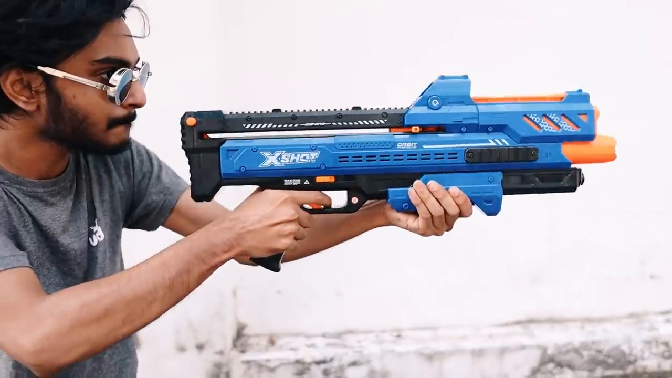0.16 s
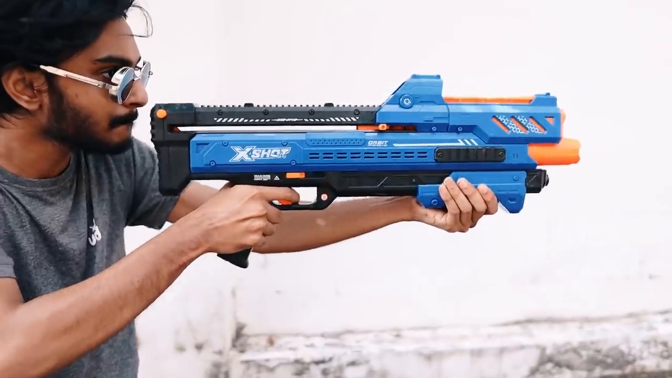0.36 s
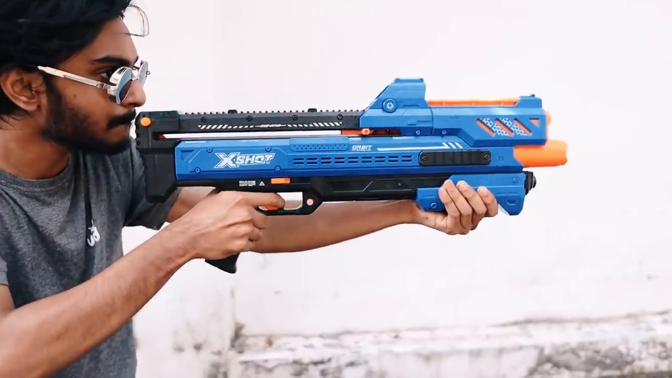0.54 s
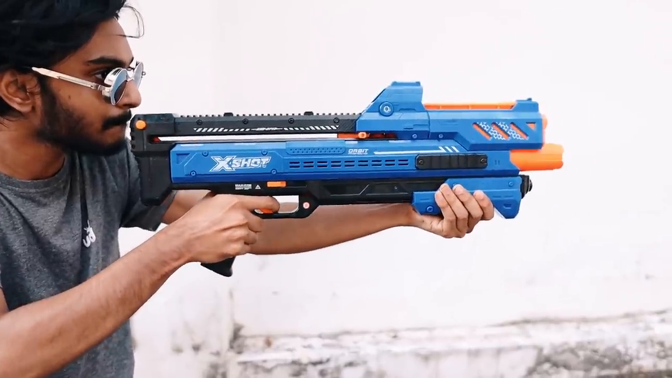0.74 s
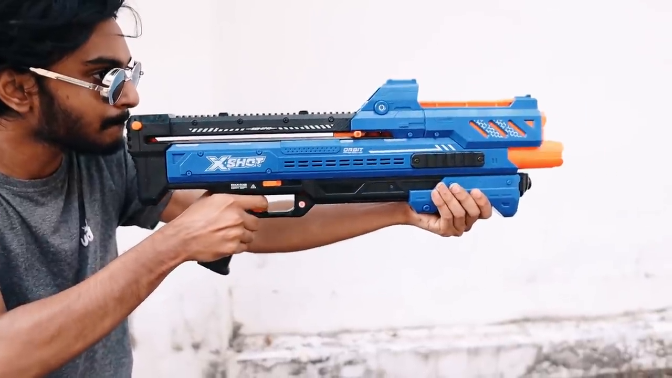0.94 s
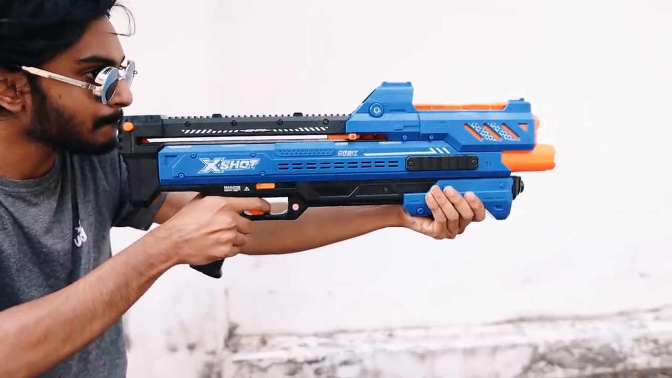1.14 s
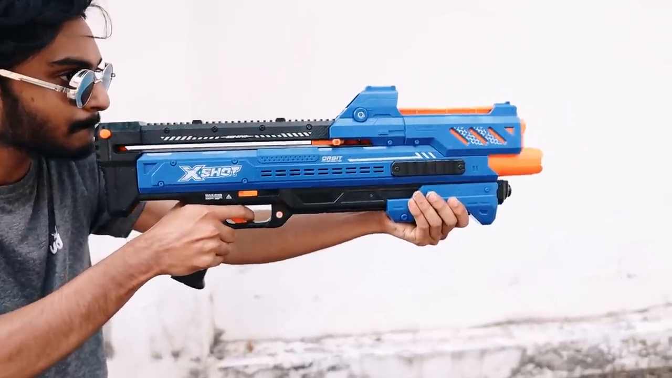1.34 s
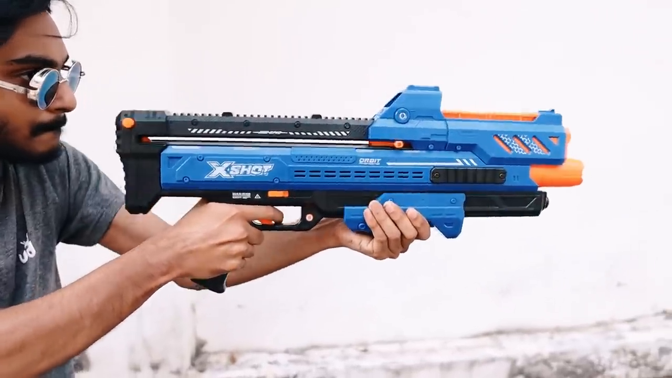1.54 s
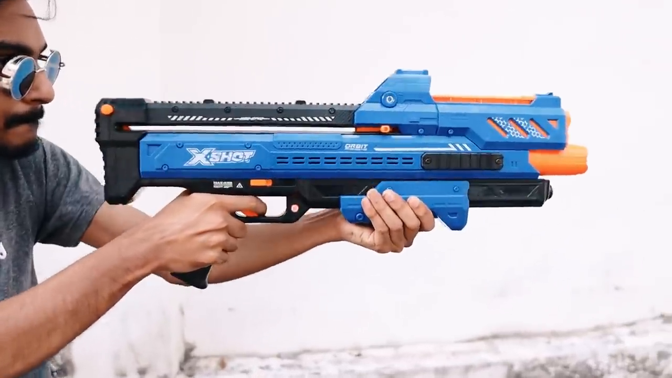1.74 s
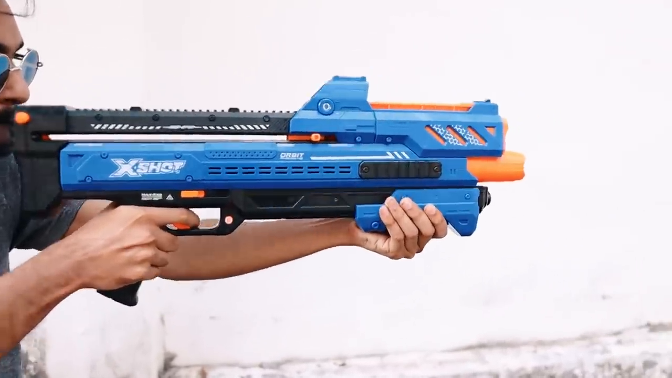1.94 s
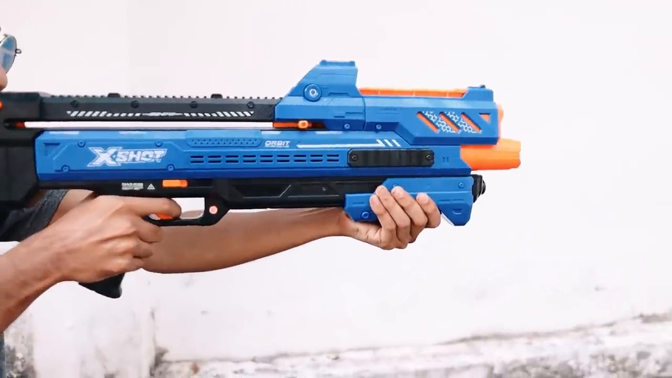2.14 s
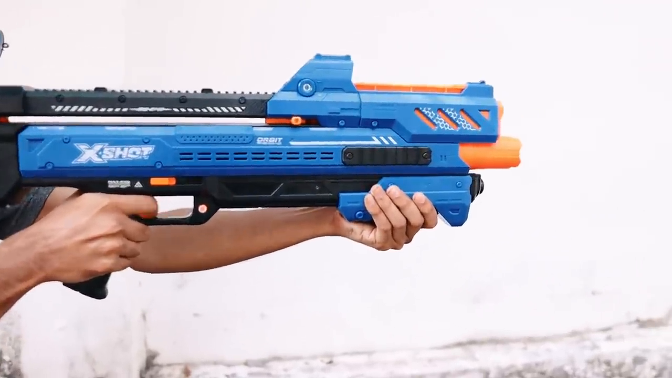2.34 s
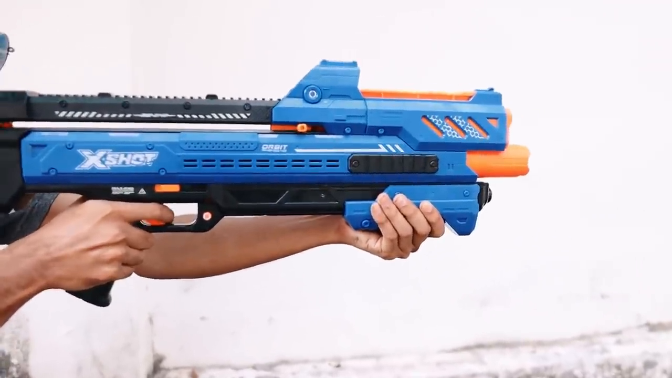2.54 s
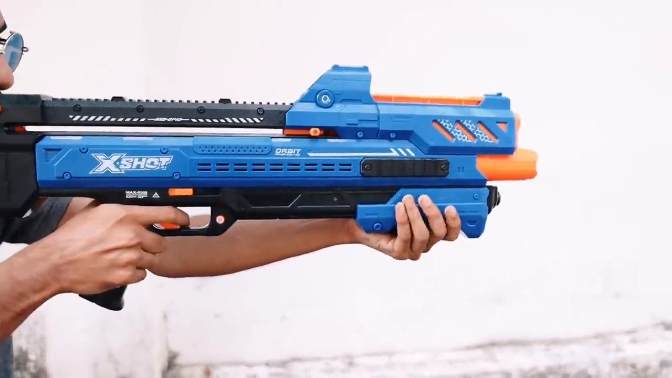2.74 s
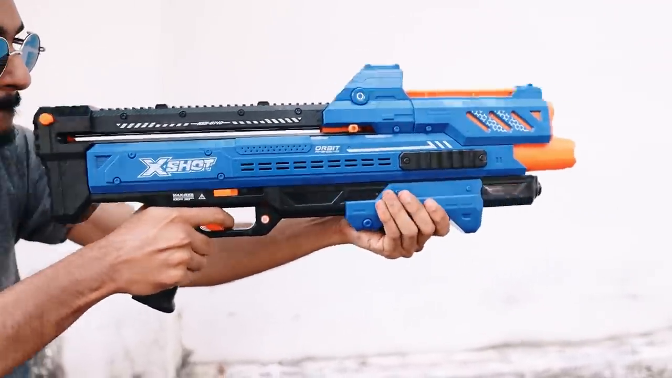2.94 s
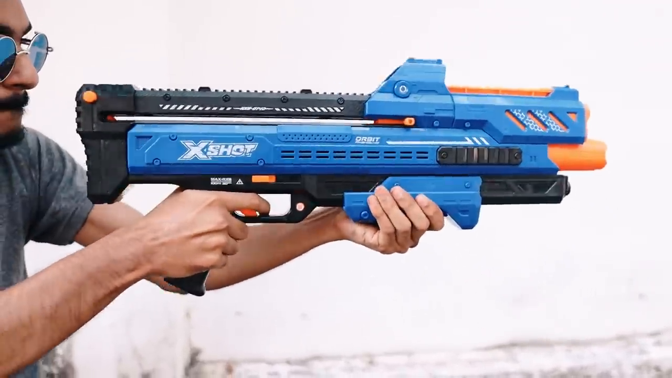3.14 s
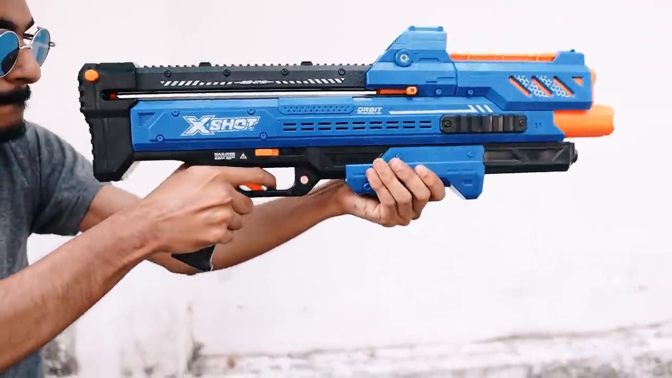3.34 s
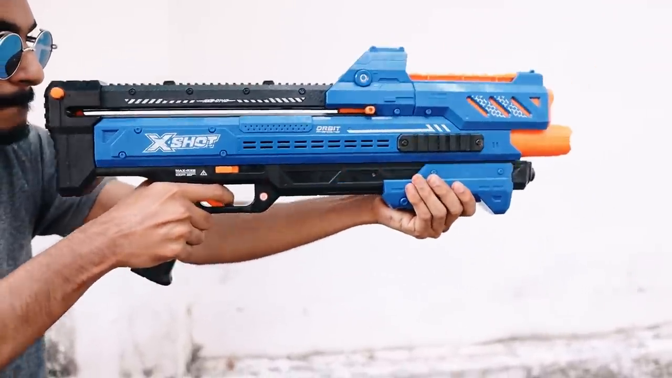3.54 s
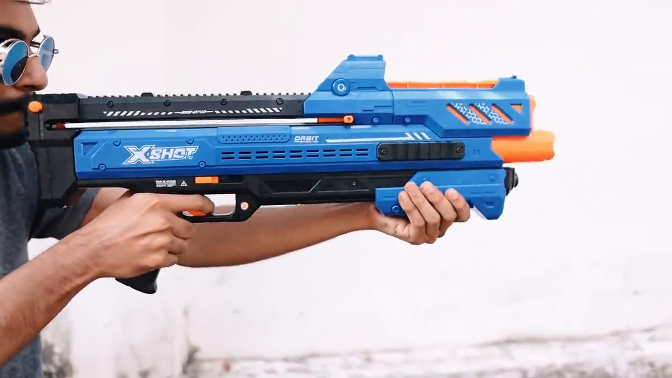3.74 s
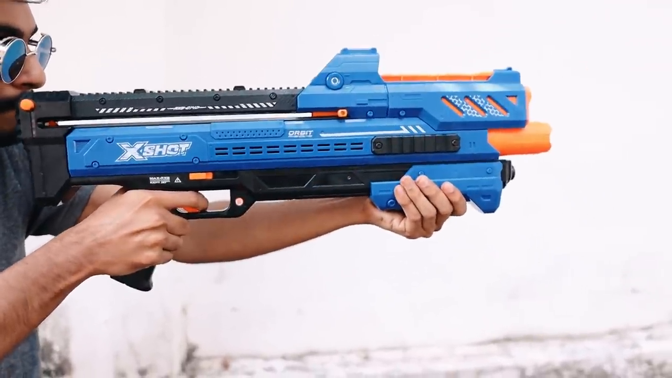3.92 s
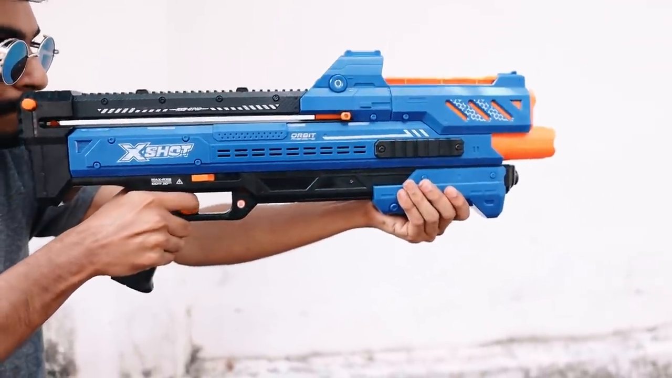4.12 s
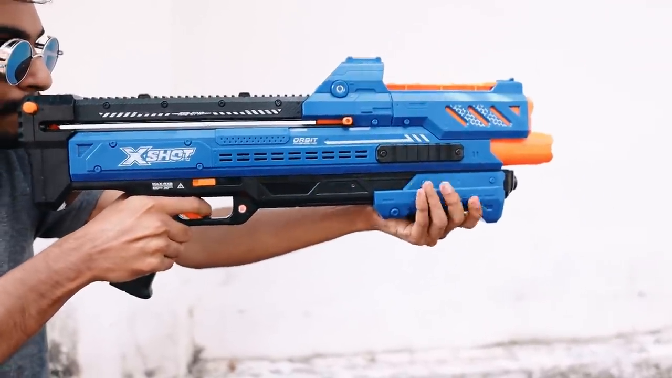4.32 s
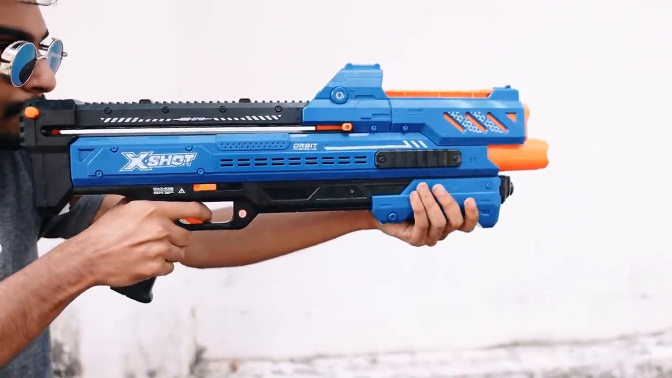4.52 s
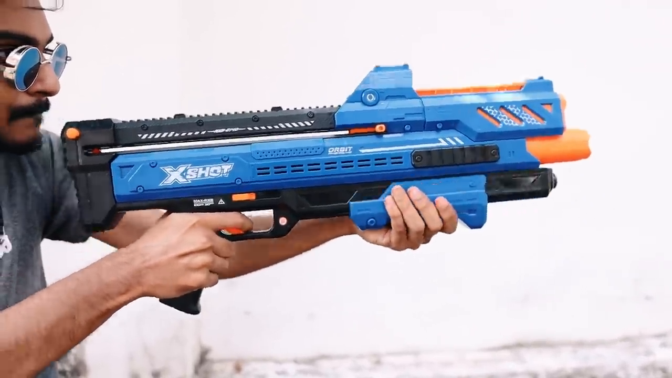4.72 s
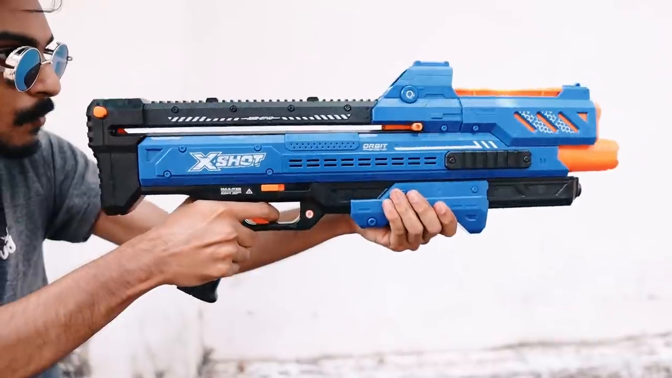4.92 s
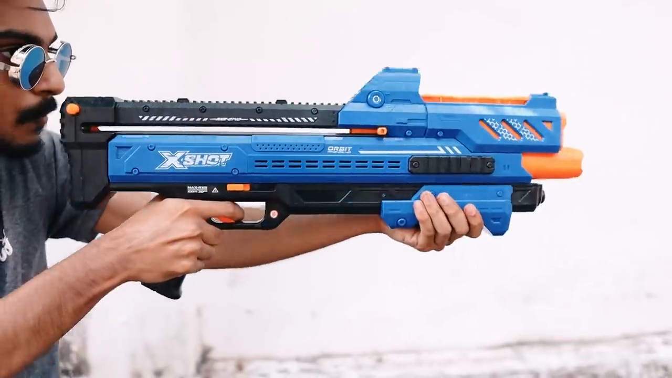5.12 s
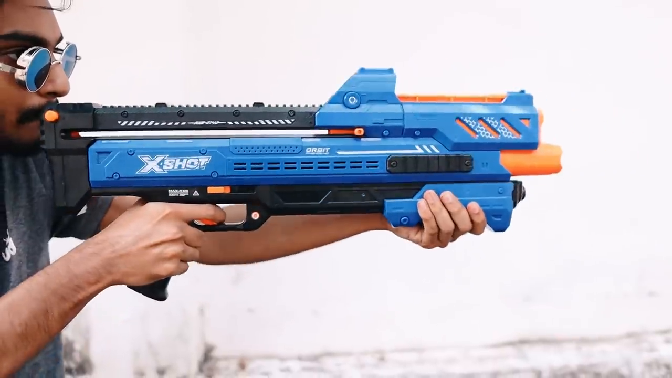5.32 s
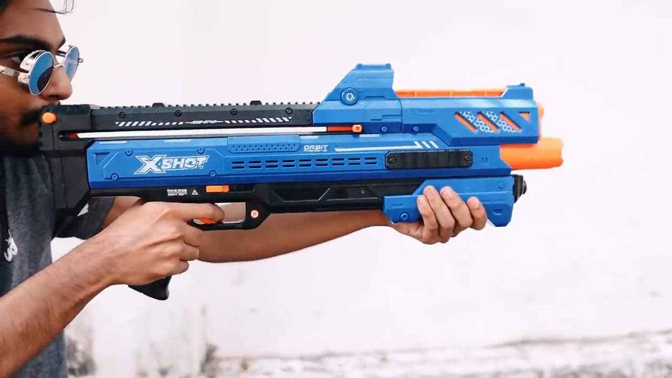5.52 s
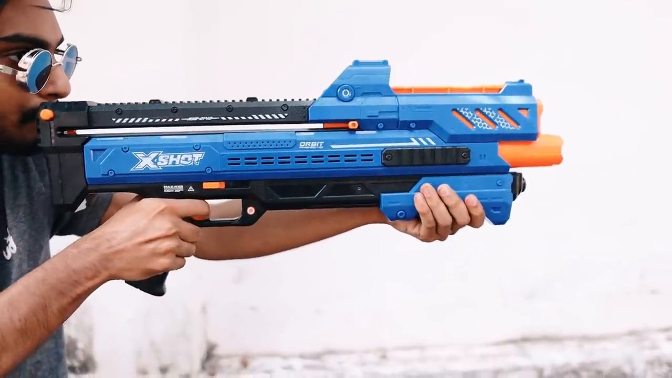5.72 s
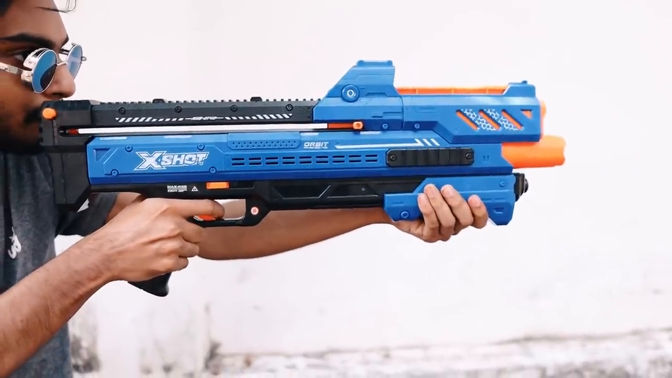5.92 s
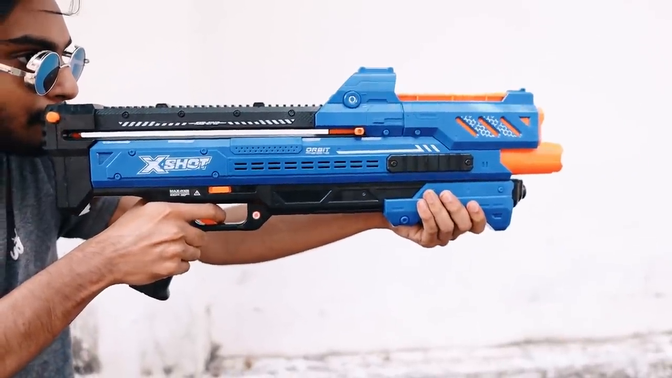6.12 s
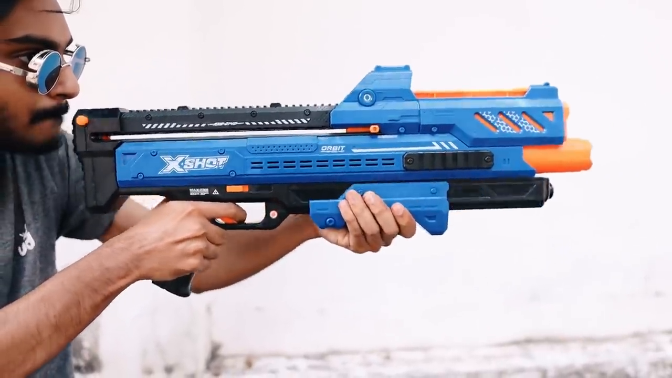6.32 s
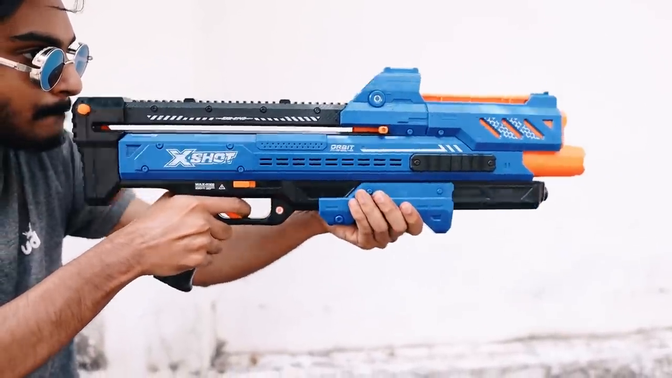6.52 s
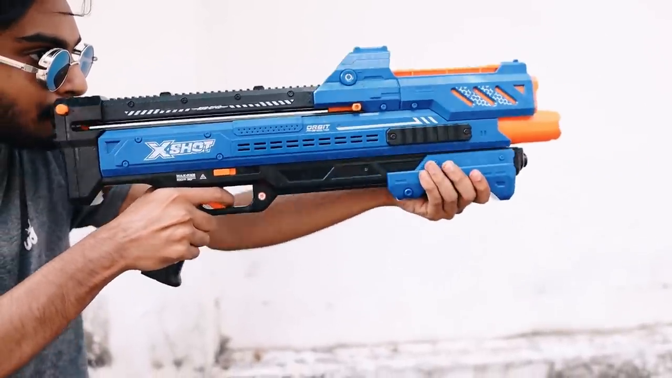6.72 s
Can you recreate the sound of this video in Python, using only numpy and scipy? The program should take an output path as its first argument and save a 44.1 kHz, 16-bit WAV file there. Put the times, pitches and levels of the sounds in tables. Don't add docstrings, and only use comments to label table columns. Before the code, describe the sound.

Outdoors beside a wall, a plastic ball blaster is worked close to a phone microphone. Its grip scrapes back, locks with a loud clack, then slides forward with double clicks. Four shots follow between pumping cycles, each a latch crack and hollow pop with a short yard echo. Two balls boom on a far board, over faint wind and street hum.

```python
import sys
import numpy as np
from scipy import signal
from scipy.fft import rfft, irfft, next_fast_len
from scipy.io import wavfile
from scipy.ndimage import uniform_filter1d

SR = 44100
rng = np.random.default_rng(int(sys.argv[2]) if len(sys.argv) > 2 else 0)


def master_out(mix):
    frames = np.transpose(np.atleast_2d(mix))
    ceiling = np.clip(frames, -1, 1)
    pcm = np.round(ceiling * 32767).astype(np.int16)
    wavfile.write(sys.argv[1], SR, pcm)


def boost_factor(decibels):
    exponent = np.asarray(decibels, float) / 20
    return 10 ** exponent


N = 298204

# f/Hz, level/dB
STREET = [(18, -48), (30, 5), (71, -1.5), (195, -35), (281, -3), (346, -14), (497, -4), (837, -7.5),
          (1830, -10.5), (6530, -22.5), (9640, -26.5), (11600, -23), (15000, -79)]
# t/s, level/dB
GUSTS = [(0.0, -56), (2.01, -56), (2.82, -53), (3.27, -61), (4.01, -48), (4.4, -52.5), (6.25, -51.5),
         (6.76, -54)]
# f/Hz, level/dB
WIND = [(20, -13), (45, -3.5), (63, 5.5), (85, -4), (200, -11.5), (400, -34.5)]
# t/s, level/dB, length/s
BUMPS = [(0.973, -46, 0.092), (2.696, -51, .1), (3.596, -56, 0.14), (3.953, -42, 0.034),
         (3.987, -40, 0.046), (4.703, -56, 0.15), (5.243, -37, 0.026), (5.254, -27, 0.056),
         (5.322, -33.5, 0.04), (5.273, -46.5, 0.16), (3.917, -39.5, 0.156), (6.076, -35, 0.06),
         (6.492, -55, 0.086)]
# f/Hz, level/dB
BUMP_COLOUR = [(25, -9), (60, 10.5), (130, -1.5), (250, -12), (500, -47)]
# t/s, level/dB, f/Hz
CHIRP = [
    (4.01, -49, 4800),
    (4.022, -38, 5270),
    (4.049, -47, 5540),
    (4.087, -45, 5300),
]
# f/Hz, t60/s
YARD = [(200, 0.98), (530, 0.72), (1400, 0.68), (3700, 0.6), (9000, 0.48)]
# f/Hz, level/dB
WALLS = [(150, -3.5), (300, 8), (600, -3.5), (1500, -1.5), (3000, -0.5), (5800, 1), (9000, -0.5),
         (15000, 1.5)]
# start t/s, stop t/s, rubbing force at start level/dB, at stop level/dB
STROKES = [(0.0, 0.075, -32, -32.5), (0.265, 0.474, -48, -31), (1.379, 1.572, -35.5, -29),
           (1.786, 1.948, -43, -26), (2.91, 3.026, -35.5, -29.5), (3.124, 3.144, -29.5, -33),
           (3.207, 3.226, -41, -30.5), (3.456, 3.626, -45.5, -23), (4.693, 4.789, -34.5, -22),
           (5.059, 5.228, -46, -23), (6.226, 6.382, -37, -26), (6.618, 6.762, -45, -21)]
# f/Hz, level/dB
RAIL = [(120, -71), (200, -21.5), (558, -2.5), (805, -11), (915, -11.5), (2290, -6), (2650, -5),
        (4420, -12), (11900, -30.5), (15900, -70)]
# f/Hz, width/Hz, level/dB
SHELL = [(573, 100, 2), (915, 120, 10), (1350, 580, 1), (1683, 63, 4), (2360, 87, -14), (3540, 190, 9.5)]
# f/Hz, level/dB
PLASTIC = [(150, -36), (250, -17), (484, -10), (788, -9), (1150, -3.5), (3060, 1), (3450, -2), (6450, -3),
           (9970, -11.5), (11700, -8), (15900, -30.5)]
# t/s, peak level/dB
PULLS = [(0.0279, -12.5), (1.3789, -31.5), (1.4014, -26), (1.4234, -18.5), (1.434, -14), (1.4417, -17),
         (1.4587, -12), (1.4754, -22), (1.4878, -11.5), (1.5179, -45), (1.5434, -8.5), (2.935, -17),
         (2.9545, -11.5), (2.9695, -11.5), (2.983, -12), (2.9943, -11.5), (3.0599, -10), (3.1231, -14.5),
         (4.6841, -36), (4.7035, -36), (4.7127, -17), (4.7318, -10), (4.7444, -8.5), (4.766, -21),
         (4.807, -5.5), (6.257, -13), (6.2744, -8), (6.287, -13), (6.3101, -12.5), (6.357, -12.5)]
# t/s, peak level/dB, ring of the steel catch level/dB
LOCKS = [
    (0.051, -0.5, -30.5),
    (1.5578, 0.5, -23.5),
    (3.2168, 0, -28),
    (4.8238, 0.4, -36),
    (6.3758, -2.5, -52),
]
# t/s, peak level/dB
SETTLES = [(0.158, -27), (1.6574, -23), (3.3385, -25), (4.929, -25), (6.4979, -20)]
# t/s, peak level/dB
PUSHES = [(0.3215, -13), (0.3441, -15.5), (0.393, -33), (0.41, -15.5), (0.4346, -12.5), (0.455, -8),
          (1.8292, -11.5), (1.8485, -12.5), (1.8904, -17.5), (1.9016, -13), (1.92, -9.5), (1.9352, -6),
          (1.975, -34), (3.506, -11), (3.5248, -12.5), (3.5726, -22), (3.5846, -9.5), (3.6055, -11.5),
          (3.6208, -6), (5.1148, -11), (5.1336, -8), (5.1717, -37), (5.1854, -9.5), (5.2036, -7),
          (5.221, -7.5), (6.6666, -10.5), (6.682, -15.5), (6.7121, -24), (6.7241, -13), (6.7516, -8)]
# t/s, peak level/dB
CREAKS = [(0.8061, -42.5), (0.8652, -31.5), (0.8738, -40), (2.292, -42), (2.3271, -40), (2.3725, -27.5),
          (3.992, -41), (4.034, -40.5), (4.0612, -32.5), (4.0955, -30), (5.5566, -43.5), (5.593, -42.5),
          (5.6207, -40), (5.659, -36.5), (5.681, -28.5)]
# t/s, peak level/dB
TICKS = [(0.234, -35), (0.2644, -45), (0.2853, -34.5), (0.634, -36.5), (1.051, -31.5), (1.3588, -44),
         (1.6337, -27.5), (1.7477, -35), (2.1979, -36.5), (2.58, -26.5), (3.078, -20), (3.426, -33.5),
         (3.458, -33.5), (3.7204, -41), (3.8973, -35.5), (4.1779, -27.5), (4.345, -26), (4.367, -27.5),
         (4.3911, -22), (4.5531, -35.5), (4.575, -41), (4.643, -38), (5.031, -32), (5.067, -33),
         (5.5119, -35.5), (5.7474, -34), (5.881, -27), (6.2193, -47), (6.6246, -45)]
# brightness of a -15 dB knock/dB per octave, t60/s, sharp edge/share 0-1
PULL_PART = (-.8, .046, .5)
PUSH_PART = (.9, .05, .3)
LOCK_PART = (-0.32, 0.045, 0.56)
SETTLE_PART = (-2, 0.091, .1)
CREAK_PART = (-2.1, 0.12, .1)
TICK_PART = (-3, 0.062, .15)
PANEL = (.27, .46, 1.03)
# f/Hz, level/dB, t60/s
LATCH_RING = [(1202, 0, 0.19)]
# t/s, peak level/dB, stiffness of the spot/pitch ratio
THUDS = [
    (2.8365, -3, .97),
    (6.1775, -4.5, 1.08),
]
# f/Hz, level/dB, t60/s
BOARD = [(161.6, -0.5, 0.28), (215.4, -3.5, 0.2), (301, 0.5, 0.16), (369, 8, 0.066), (459.4, -1.5, 0.21),
         (558, -7, 0.32)]
# f/Hz, level/dB
FLAP = [(59, -50), (100, -19), (380, 1.5), (698, -5), (841, -9), (1600, -17.5), (1810, -23.5), (8350, -43),
        (12100, -32), (14000, -54)]
# f/Hz, level/dB, t60/s
SQUASH = [(540, 2.5, 0.024), (860, -1, 0.0032)]
# t/s, level/dB, ringing f/Hz, t60/s
BOUNCES = [
    (.965, -29, 2530, 0.16),
    (2.465, -23, 1350, 0.47),
    (4.2, -25.5, 337, 0.49),
    (5.779, -27, 1430, 0.58),
]
# t/s, crack peak level/dB, pop level/dB
SHOTS = [
    (0.9, 0.5, -1.5),
    (2.4, -1, 0.5),
    (4.121, -1, 4),
    (5.712, -1, 3),
]
# f/Hz, level/dB
CRACK = [(120, -29.5), (200, -15.5), (646, -7.5), (1340, -7), (2950, -4.5), (5120, -12), (5820, -10),
         (8090, -15.5), (9900, -14.5), (15900, -22)]
# f/Hz, level/dB, t60/s
SEAR = [(1257, 0, 0.054), (3410, -0.5, .015), (5650, -8, .012), (2250, 1.5, 0.031)]
# f/Hz, level/dB, t60/s
BARREL = [(573, -4.5, 0.048), (316, -6.5, 0.023), (920, -4, 0.018), (1460, -1, 0.012), (2410, -3.5, 0.0032)]
# f/Hz, phase/rad
LEAD = [(300, -.2), (1000, -.1), (2070, .5), (2800, 1.6), (4000, 2.2), (8000, 2.5), (15000, 2.9)]
# f/Hz, share 0-1
ALIKE = [(40, .95), (140, 1), (350, 0.97), (1000, 0.74), (2500, 0.51), (5000, 0.55), (9000, 0.27),
         (14000, .8)]
# f/Hz, level/dB
LEAN = [(60, 0), (180, -1), (550, 0.5), (1650, -4), (4970, 0), (15000, 0.5)]


def evened(x):
    return x / np.sqrt(np.mean(x ** 2) + 1e-20)


def hiss(length):
    return rng.standard_normal((2, length))


def read(points, hz):
    f, value = np.transpose(points)
    return np.interp(np.log(hz + 1), np.log(f + 1), value)


def add(mix, s, sound):
    part = mix[:, round(s * SR):][:, :sound.shape[1]]
    part += sound[:, :part.shape[1]]


def coloured(x, points, tilt_db=0, peak_hz=1000, peak_db=0, width=0.27):
    size = next_fast_len(x.shape[-1])
    hz = np.fft.rfftfreq(size, 1 / SR) + 1
    hump = peak_db / (1 + ((hz - peak_hz) / (width * peak_hz)) ** 2)
    slope = tilt_db * np.log2(np.maximum(hz, 450) / 2000)
    shape = boost_factor(read(points, hz) + slope + hump)
    return evened(irfft(rfft(x, size) * shape, size)[..., :x.shape[-1]])


def onset(t, rise):
    return 1 - np.exp(-t / rise)


def dying(t, t60, rise):
    return onset(t, rise) * boost_factor(-60 * t / t60)


def ring(modes, t, spread):
    one = np.zeros(len(t))
    for hz, db, t60 in modes:
        detuned = hz * (1 + spread * rng.standard_normal())
        one -= boost_factor(db - 60 * t / t60) * np.sin(2 * np.pi * detuned * t)
    return np.array([one, np.roll(one, 9)]) / abs(one).max()


def outdoors():
    out = coloured(hiss(N), STREET) * boost_factor(-50.5)
    s, db = np.transpose(GUSTS)
    slow = uniform_filter1d(uniform_filter1d(rng.standard_normal(N), 1500), 1500)
    wind = evened(coloured(hiss(N), WIND) * boost_factor(2.0 * evened(slow)))
    out += wind * boost_factor(np.interp(np.arange(N) / SR, s, db) + 2.5)
    thumps = coloured(hiss(N), BUMP_COLOUR)
    for s, db, length in BUMPS:
        swell = np.hanning(round(length * SR))
        add(out, s, boost_factor(db) * thumps[:, round(s * SR):][:, :len(swell)] * swell)
    return out


def bird():
    s, db, hz = np.transpose(CHIRP)
    t = np.arange(s[0], s[-1], 1 / SR)
    breath = evened(uniform_filter1d(hiss(len(t)), 60))
    whistle = np.sin(2 * np.pi * np.cumsum(np.interp(t, s, hz)) / SR)
    out = np.zeros((2, N))
    add(out, s[0], boost_factor(np.interp(t, s, db)) * breath * whistle)
    return out


def yard(x, reach):
    taps = np.zeros((2, SR))
    at = np.arange(0, SR - 20, 20) + rng.integers(0, 20, (2, SR // 20 - 1))
    np.put_along_axis(taps, at, rng.choice([-1., 1.], at.shape), 1)
    hz, t, z = signal.stft(taps, SR, nperseg=256)
    fade_db = -60 * t / (reach * read(YARD, hz)[:, None])
    tail = signal.istft(z * boost_factor(read(WALLS, hz)[:, None] + fade_db), SR, nperseg=256)[1]
    since = np.maximum(np.arange(tail.shape[1]) / SR - .03, 0)
    tail *= (since > 0) * (1 - 0.18 * np.exp(-since / 0.03))
    tail /= np.linalg.norm(tail[0])
    tail[:, round(.035 * SR)] += .15
    return signal.fftconvolve(x, tail, axes=1)[:, :N]


def shell(x):
    out = 0
    for hz, width, db in SHELL:
        out = out + boost_factor(db) * signal.lfilter(*signal.iirpeak(hz, hz / width, SR), x)
    return evened(out)


def force(t, start, stop, start_db, stop_db):
    grip_db_per_s, let_go_db_per_s = 1505, 514
    settling_db, settling_s = -30.5, 0.075
    db = np.interp(t, [start, stop], [start_db, stop_db])
    db -= grip_db_per_s * np.maximum(start - t, 0)
    db -= let_go_db_per_s * np.maximum(t - stop, 0)
    drag = (t > stop) * boost_factor(stop_db + settling_db) * np.exp(-((t - stop) / settling_s) ** 4)
    return 20 * np.log10(boost_factor(db) + drag + 1e-9)


def strokes():
    out = np.zeros((2, N))
    slips_per_s, slip_s = 250, 0.0027
    for row in STROKES:
        t = max(row[0] - .2, 0) + np.arange(round(.6 * SR)) / SR
        size_db = 3.5 * np.minimum(rng.exponential(1, len(t)), 2)
        slips = boost_factor(size_db) * (rng.random(len(t)) < slips_per_s / SR)
        grit = 1.05 + evened(signal.lfilter([1], [1, -np.exp(-1 / (slip_s * SR))], slips))
        rub = coloured(hiss(len(t)), RAIL) * grit
        rub = evened(evened(rub) + 0.54 * shell(rub))
        force_db = force(t, *row)
        edge = np.diff(rub, prepend=0) * 1.65 * boost_factor(0.4 * (force_db + 30.5))
        add(out, t[0], (rub + edge) * boost_factor(force_db + 2))
    return out


def knocks():
    kinds = [(PULLS, PULL_PART), (LOCKS, LOCK_PART), (SETTLES, SETTLE_PART), (PUSHES, PUSH_PART),
             (CREAKS, CREAK_PART), (TICKS, TICK_PART)]
    found = []
    for rows, (bright_db, t60, edge) in kinds:
        for s, db, *_ in rows:
            found.append((s, db, bright_db + 0.19 * (db + 15), t60, edge))
    return found


def clacks():
    out, t = np.zeros((2, N)), np.arange(3072) / SR
    dullest_db = -6
    for s, db, bright_db, t60, edge in knocks():
        hz = rng.uniform(1789, 5500)
        knock = coloured(hiss(len(t)), PLASTIC, max(bright_db, dullest_db), hz, 7.5, width=0.05)
        body = signal.lfilter(*signal.butter(N=1, Wn=2500, fs=SR), knock)
        t60 = max(t60, .006) * boost_factor(1.0 * rng.standard_normal())
        snap = (knock - body) * (dying(t, 0.58 * t60, 0.00087) + edge * dying(t, 0.0048, .0001))
        notes = [(ratio * hz, -1.5 * k, 0.7 * t60) for k, ratio in enumerate(PANEL)]
        panel = ring(notes, t, .12) * onset(t, .0012)
        add(out, s, boost_factor(db + 1.0) * (body * dying(t, t60, 0.0047) + snap + boost_factor(-8) * panel))
    return out


def latch():
    out, t = np.zeros((2, N)), np.arange(12000) / SR
    for s, _, ring_db in LOCKS:
        add(out, s, boost_factor(ring_db) * ring(LATCH_RING, t, .008))
    return out


def thuds():
    out, t = np.zeros((2, N)), np.arange(20000) / SR
    squash_s = .0007
    for s, db, stiff in THUDS:
        tick = coloured(hiss(len(t)), PLASTIC, peak_hz=3080, peak_db=6) * dying(t, 0.012, 0.00014)
        rattle = coloured(hiss(len(t)), FLAP) * dying(t, 0.38, squash_s)
        notes = [(hz * stiff, mode_db, t60) for hz, mode_db, t60 in BOARD]
        boom = ring(notes, t, 0.017) * onset(t, squash_s)
        blow = ring(SQUASH, t, .02) * onset(t, squash_s)
        thud = boost_factor(-15.0) * tick + boost_factor(-12) * rattle + boost_factor(0.5) * boom + boost_factor(-6) * blow
        add(out, s, boost_factor(db) * thud)
    return out


def bounces():
    out, t = np.zeros((2, N)), np.arange(24000) / SR
    for (s, db, hz, t60), (shot_s, _, pop_db) in zip(BOUNCES, SHOTS):
        knock = coloured(hiss(len(t)), CRACK, tilt_db=-4.0, peak_hz=hz, peak_db=13.0, width=0.079)
        add(out, s, boost_factor(db) * knock * dying(t, t60, 0.0027))
        hum = evened(signal.lfilter(*signal.iirpeak(575, 12.5, SR), hiss(len(t))))
        add(out, shot_s + .03, boost_factor(pop_db - 28.5) * hum * dying(t, 0.71, 0.021))
    return out


def shots():
    out, t = np.zeros((2, N)), np.arange(6000) / SR
    run_s = .0099
    for s, crack_db, pop_db in SHOTS:
        crack = coloured(hiss(len(t)), CRACK, peak_hz=1280, peak_db=14.5) * dying(t, .03, 0.00027)
        add(out, s, boost_factor(crack_db - 0.5) * crack + boost_factor(crack_db - 2.0) * ring(SEAR, t, 0.018))
        pop = ring(BARREL, t, 0.0065) * onset(t, 0.000068)
        slap = coloured(hiss(len(t)), CRACK, tilt_db=-4.5) * dying(t, .028, 0.00004)
        add(out, s + run_s, boost_factor(pop_db) * pop + boost_factor(pop_db - 6.0) * slap)
    return signal.lfilter(*signal.butter(N=1, Wn=110, btype="high", fs=SR), out)


def scene():
    shot, thud = shots(), thuds()
    parts = clacks() + strokes() + latch()
    wet = yard(boost_factor(-15) * shot + boost_factor(-11) * thud, 0.83) + yard(boost_factor(-17.0) * parts, 0.6)
    return shot + thud + parts + wet + bounces() + bird() + outdoors()


def ports(x):
    size = next_fast_len(N)
    hz, (a, b) = np.fft.rfftfreq(size, 1 / SR), rfft(x, size)
    same, lean = np.clip(read(ALIKE, hz), 0, 1), boost_factor(read(LEAN, hz) / 2)
    other = same * a + np.sqrt(1 - same ** 2) * b
    return irfft([a * lean, other * np.exp(-1j * read(LEAD, hz)) / lean], size)[:, :N]


def starved(x):
    left, right = x
    hz, _, z = signal.stft([left + right, left - right], SR, nperseg=1024)
    band = np.arange(len(hz)) // 16
    power = np.add.reduceat(abs(z) ** 2, np.arange(0, len(hz), 16), axis=1)
    band_db = 10 * np.log10(power + 1e-20)
    luck_db = 7.1 * evened(uniform_filter1d(rng.standard_normal(band_db.shape[1:]), 6))
    rise_db = .5 * np.arange(len(luck_db))[:, None]
    limit_db = .6 * band_db[0].max(0) - 45.5 + luck_db + rise_db - 6
    limits_db = limit_db - np.array([0, 8.])[:, None, None]
    lost = (band_db < limits_db)[:, band] & (hz[:, None] > 6000)
    mid, side = signal.istft(z * ~lost, SR, nperseg=1024)[1][:, :N] / 2
    return np.array([mid + side, mid - side])


def band_limit(x):
    return signal.sosfilt(signal.butter(12, 16090, fs=SR, output="sos"), x)


def record(dry):
    lifted = signal.lfilter(*signal.butter(N=3, Wn=48, btype="high", fs=SR), ports(dry))
    finished = starved(np.clip(lifted, -1, 1))
    return band_limit(finished)


dry = scene()
out = record(dry)
master_out(out)
```